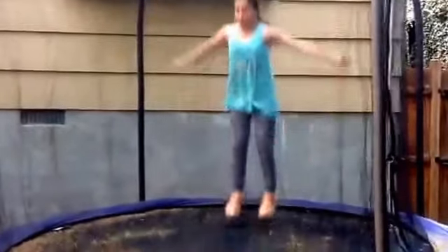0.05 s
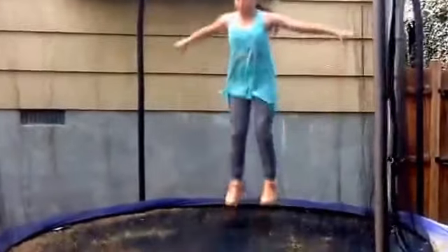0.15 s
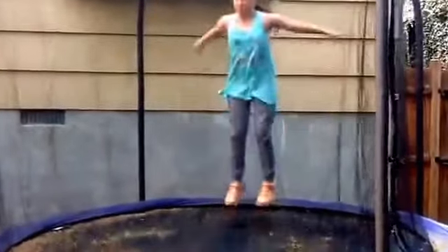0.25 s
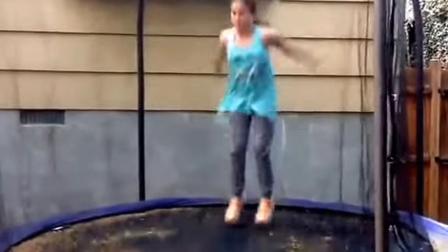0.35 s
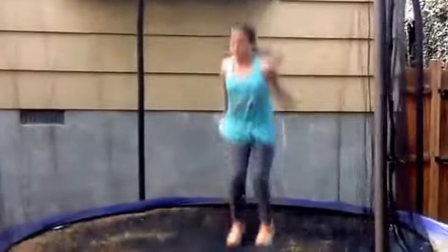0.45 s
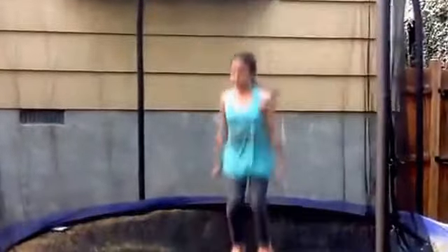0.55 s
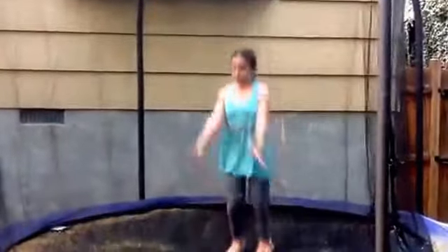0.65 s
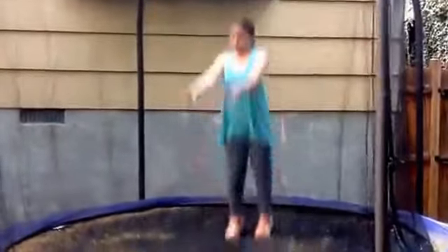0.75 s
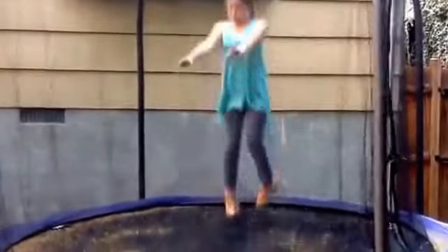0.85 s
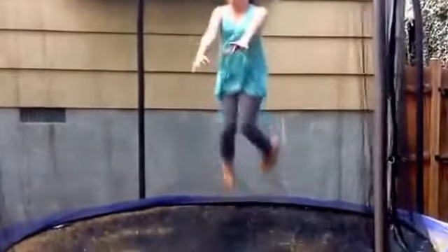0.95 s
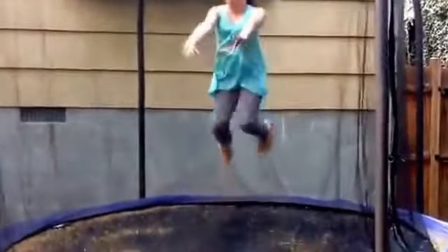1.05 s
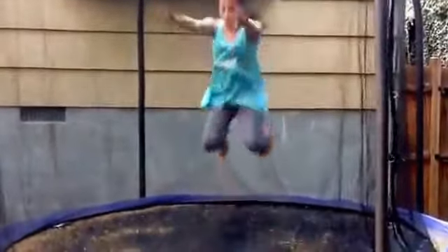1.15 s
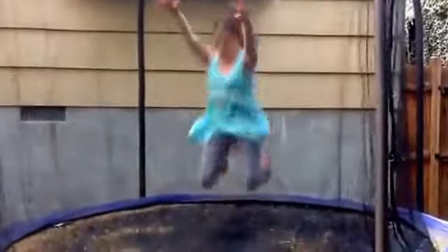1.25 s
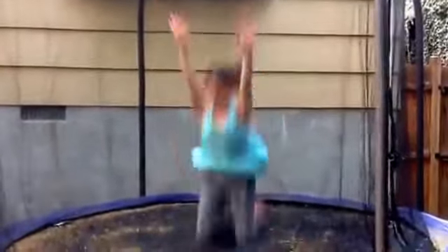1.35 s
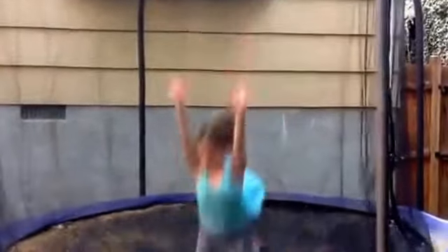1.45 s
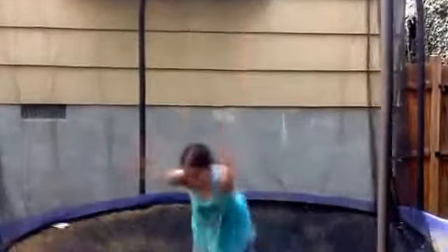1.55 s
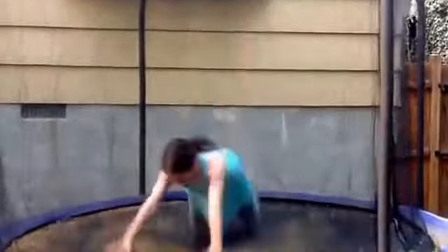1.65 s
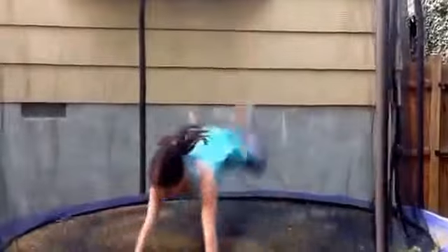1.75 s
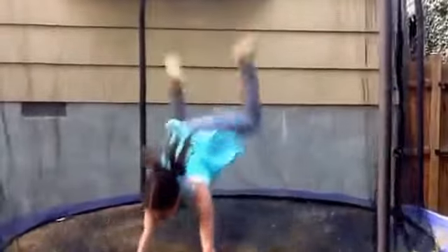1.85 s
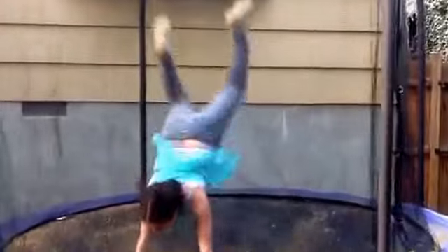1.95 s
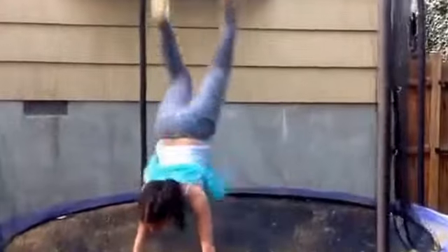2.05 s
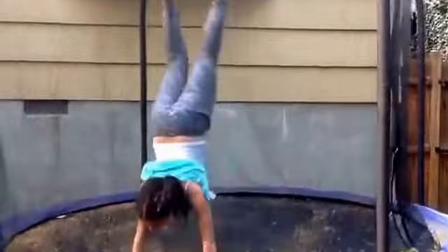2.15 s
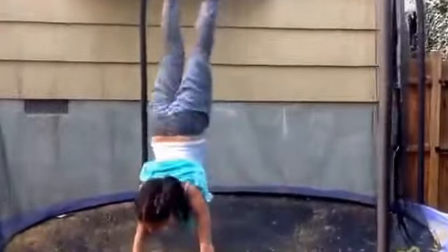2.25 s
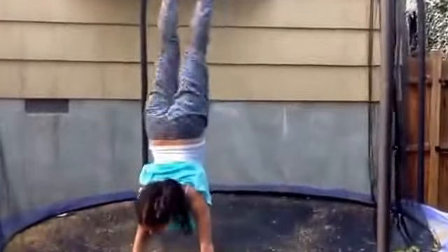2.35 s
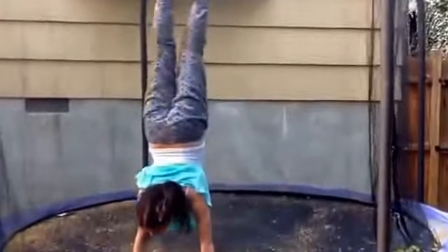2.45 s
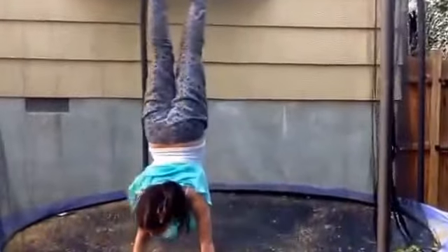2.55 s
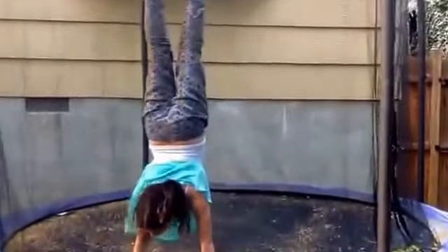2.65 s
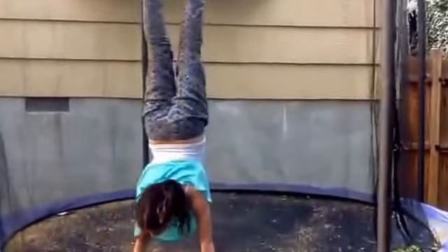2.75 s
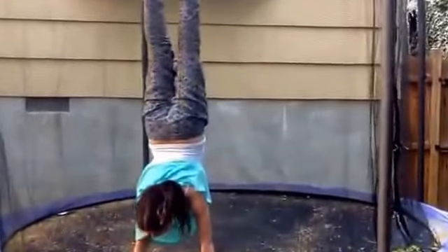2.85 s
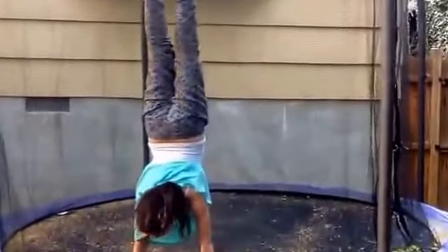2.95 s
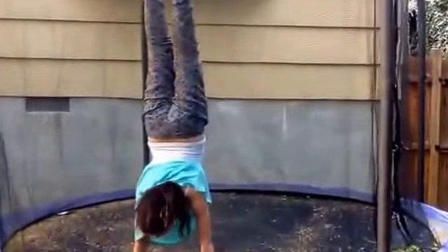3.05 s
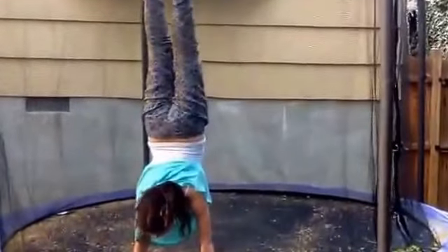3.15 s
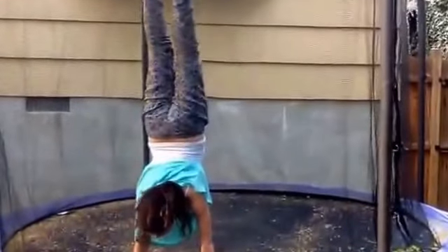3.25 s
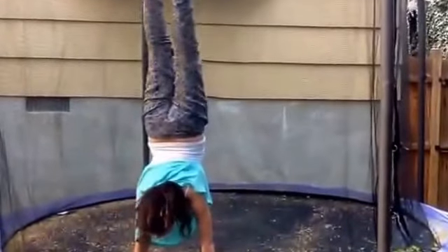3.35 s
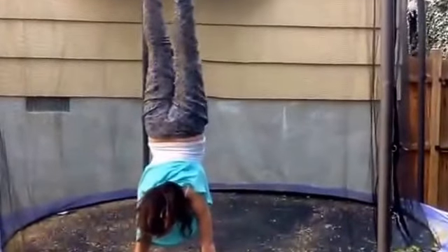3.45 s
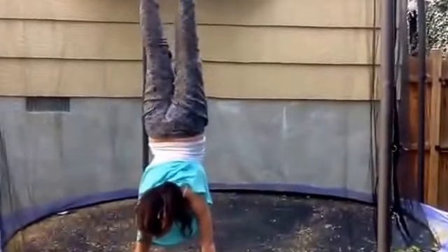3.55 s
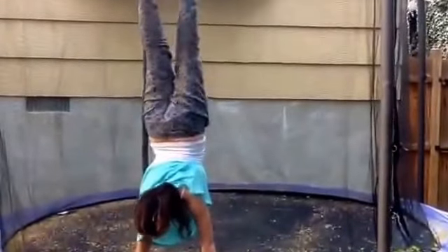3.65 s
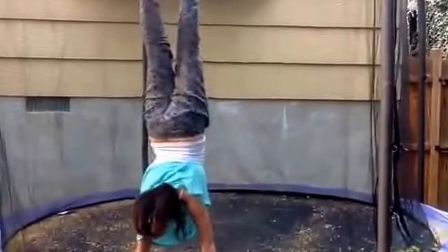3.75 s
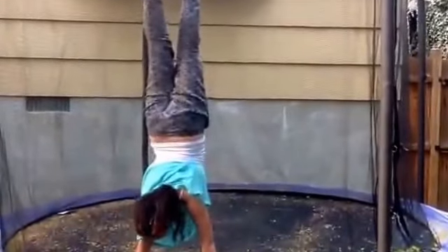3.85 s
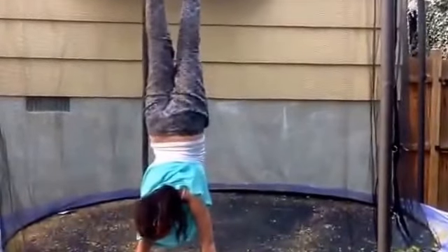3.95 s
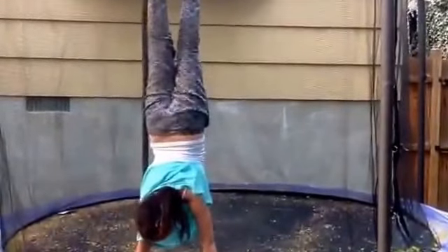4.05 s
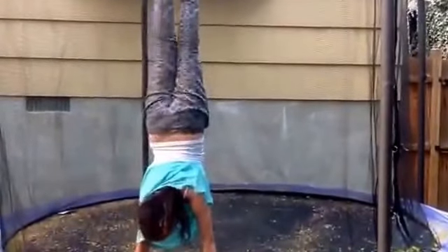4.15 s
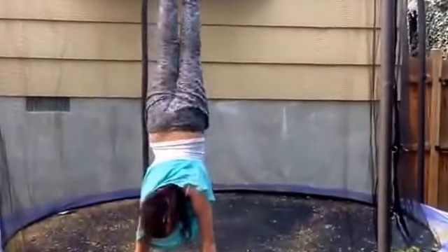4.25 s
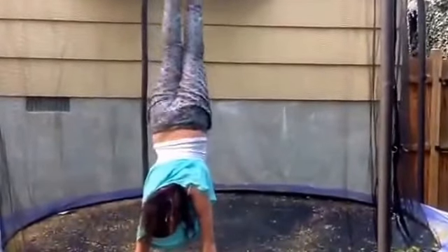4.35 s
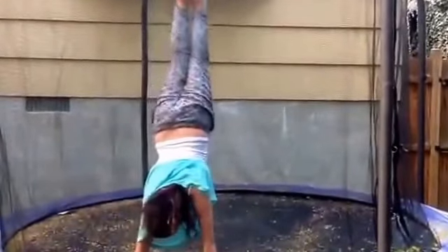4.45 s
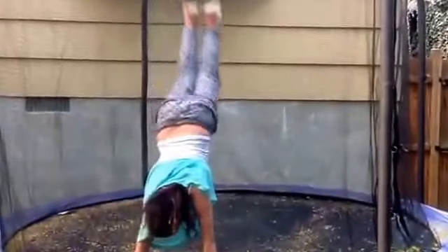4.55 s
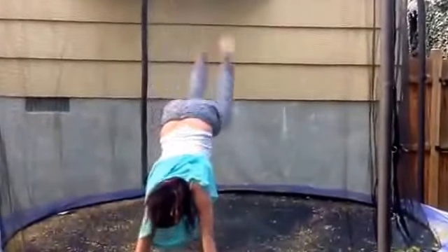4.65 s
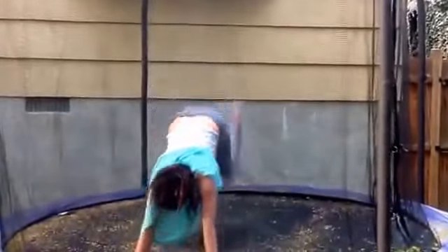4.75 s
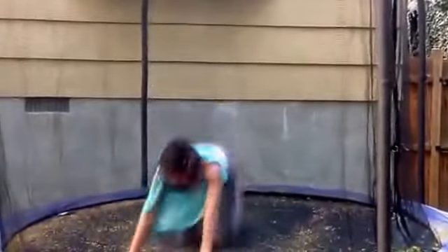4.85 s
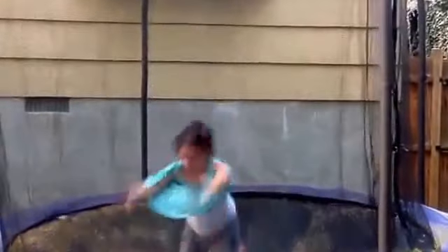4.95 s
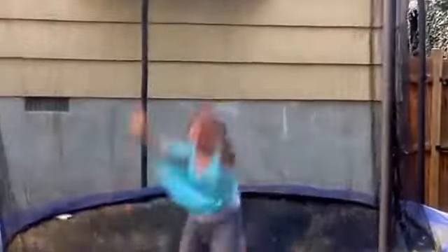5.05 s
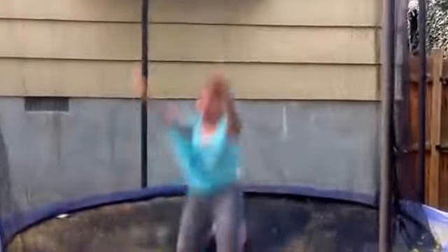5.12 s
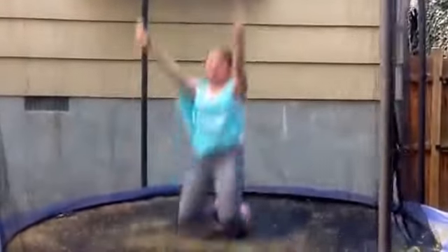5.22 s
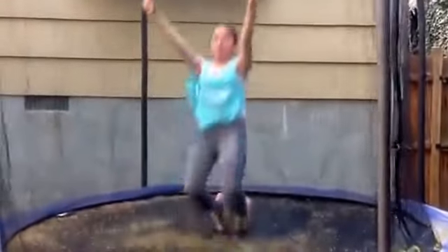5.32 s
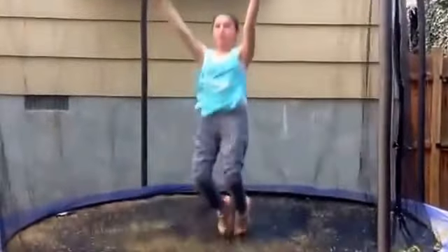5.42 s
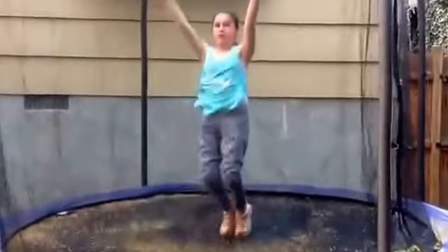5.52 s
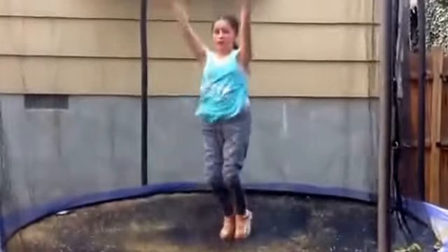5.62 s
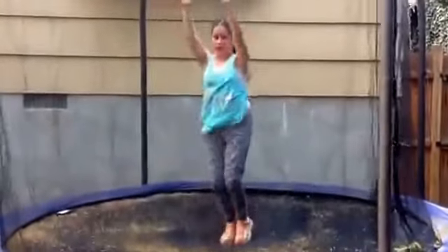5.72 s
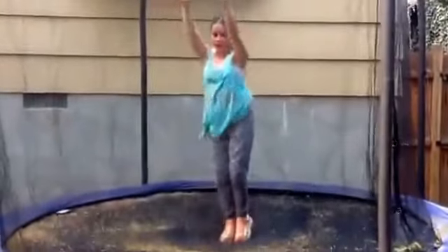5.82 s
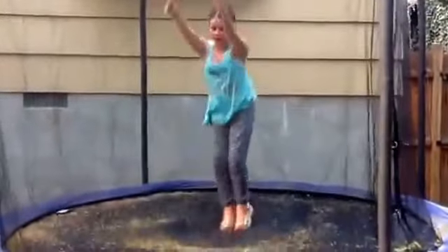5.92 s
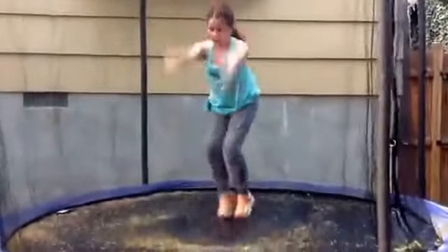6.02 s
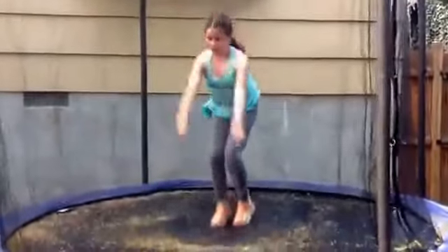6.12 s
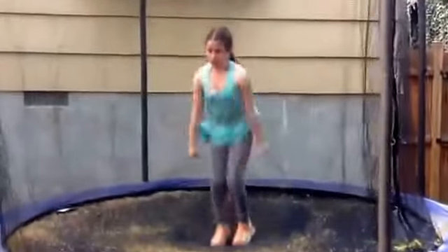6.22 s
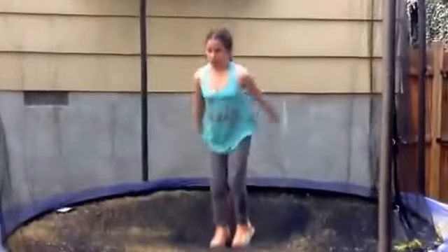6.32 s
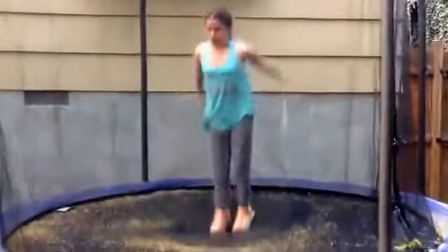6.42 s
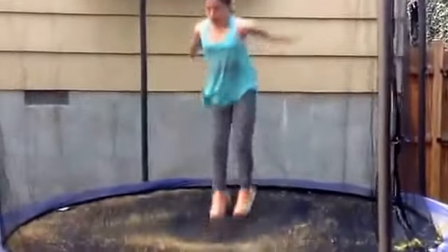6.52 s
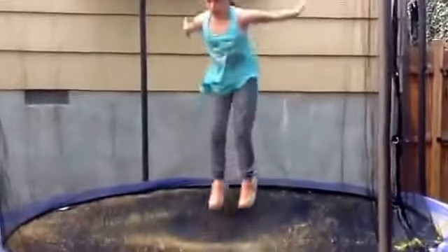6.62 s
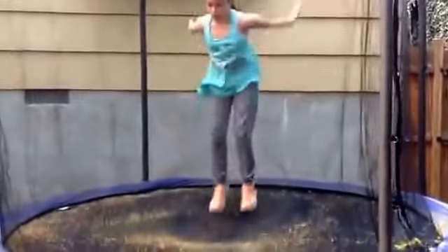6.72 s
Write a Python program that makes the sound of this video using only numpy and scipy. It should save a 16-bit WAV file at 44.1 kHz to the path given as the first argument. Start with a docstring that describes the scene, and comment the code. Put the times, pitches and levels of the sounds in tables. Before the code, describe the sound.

Uneven trampoline bounces, a sharp ringing clack of the frame, a lull, then more landings over faint chirps and distant traffic.

```python
"""Bouncing on a backyard trampoline

Feet slap the woven mat, which thuds, swishes as it stretches and makes the springs squeak.
Two heavy landings frame a quiet handstand; the first comes with a hard, ringing clack of the frame.
Small birds call over the rumble of a far town, and the house wall and fence send back an echo."""
import sys
import numpy as np
from scipy import signal
from scipy.fft import rfft, irfft, next_fast_len
from scipy.io import wavfile
from scipy.ndimage import map_coordinates

SR = 44100
rng = np.random.default_rng(int(sys.argv[2]) if len(sys.argv) > 2 else 0)


def store_pcm(level_fs):
    """Save levels as 16-bit WAV."""
    pcm = np.round(np.clip(level_fs, -1, 1) * 32767).astype(np.int16)
    wavfile.write(sys.argv[1], SR, np.atleast_2d(pcm).T)


N = 298998

# Skin hits the mat. Each row: start in seconds, level in dB, fizz in dB above that level,
# fade time in seconds. A fade time is how long a sound takes to drop by 60 dB.
SKIN_SLAPS = [(0.0806, -50, -4.5, 0.033), (0.3763, -51.5, -8, .05), (0.525, -31, -6.5, 0.016),
              (0.617, -28, -12, 0.083), (0.8867, -52.5, -1, 0.036), (1.4235, -45, -3, 0.039),
              (1.8087, -36.5, -13.5, 0.107), (2.93, -53.5, 1.5, 0.031), (4.6892, -38.5, -20, 0.16),
              (4.9255, -49, 3, 0.047), (5.0, -34, -3.5, 0.049), (5.645, -41.5, -7, .09),
              (6.0157, -31.5, -21.5, 0.098), (6.0582, -40, -24, 0.066), (6.466, -40.5, -20, .13),
              (6.7228, -44.5, -16.5, 0.177)]
# Weight lands on the mat. Each row: start in seconds, level in dB, pitch in Hz, fade time in seconds.
MAT_THUDS = [(1.413, -37.5, 251.3, 0.076), (1.427, -31, 248, 0.03), (1.488, -39, 290, 0.059),
             (1.514, -31.5, 251, 0.08), (1.779, -49.5, 317, 0.14), (4.9223, -25, 233.4, 0.022),
             (5.024, -35, 257, 0.063)]
# Clothed legs hit the mat. Each row: loudest moment in seconds, level in dB,
# boom in dB above that level, rise time in seconds, fade time in seconds.
LEG_SMACKS = [(0.615, -53, -2, .03, 0.21), (1.518, -34, -3, 0.0146, 0.063),
              (5.026, -32.5, -1.5, 0.0045, 0.071)]
# The tone of the cloth, and of the mat booming under it. Each row: frequency in Hz, strength in dB.
CLOTH_TONE = [(200, -22.5), (410, -2), (620, -12), (800, -6), (1000, 0.5), (1550, 1.5), (2100, -11),
              (4000, -16.5), (9000, -23), (15000, -17)]
BOOM_TONE = [(40, -47), (130, -16), (250, -1), (420, 1.5), (700, -21), (1500, -13)]
# Hard knocks in the frame. Each row: start in seconds, level in dB, strongest frequency in Hz.
FRAME_KNOCKS = [(1.482, -27, 3680), (1.494, -16.5, 7500), (1.809, -42, 3700), (2.157, -56.5, 2390),
                (2.827, -52.5, 2750), (4.832, -41, 2520)]
# The notes the frame rings at. Each row: pitch in Hz, strength in dB, fade time in seconds.
FRAME_NOTES = [(1330, -16, .12), (1513, -1.5, 0.27), (2336, 1.5, 0.17), (3180, 2, 0.105),
               (3560, 1.5, 0.075), (4174, -2, 0.12), (4844, -1, 0.045), (6920, -2, 0.0496),
               (7330, -2.5, 0.12), (7600, -13, .055), (7850, -2, 0.092), (8156, 0.5, 0.089),
               (8800, -16.5, .04), (11000, -1, 0.088)]
# Weight stretches the mat. Each row: start in seconds, level in dB, time held in seconds.
MAT_PRESSES = [(0.434, -59, 0.122), (0.55, -54, 0.093), (1.42, -57.5, .08), (1.5, -42.5, 0.15),
               (1.925, -59, 0.045), (2.3, -60, 0.032), (2.852, -65, 0.0225), (4.913, -53, 0.095),
               (4.993, -42, 0.12), (5.659, -60.5, 0.19), (6.003, -60, 0.169), (6.277, -59.5, 0.12)]
# The mat springs back or sways. Each row: loudest moment in seconds, level in dB.
MAT_SWAYS = [(0.0, -60.5), (0.75, -57.5), (1.85, -59), (1.99, -56), (4.46, -69.5), (4.82, -65), (5.45, -63),
             (5.58, -64.5), (5.98, -66), (6.33, -57), (6.44, -59.5)]
# The tone of the rubbing weave. Each row: frequency in Hz, strength in dB.
WEAVE_TONE = [(240, -36.5), (400, -1.5), (558, -7), (964, -2), (1290, -7), (1740, -2.5), (2120, -4.5),
              (5110, -8), (8060, -6.5), (12300, -7), (15000, -10.5)]
# A lightly loaded weave sounds thinner. Each row: frequency in Hz, change in dB.
LIGHT_LOAD_CHANGE = [(1000, -1), (3000, 3), (7000, 1), (12000, 1.5), (15000, -1)]
# Spring hooks slip. Each row: start in seconds, length in seconds, pitch in Hz, level in dB, strongest
# frequency in Hz, drop in dB per octave away from it, unsteadiness as a share of the pitch.
HOOK_SLIPS = [(1.852, 0.0288, 1100, -52, 1000, 11, 0.045), (1.927, 0.0255, 1133, -47, 1780, 14, .07),
              (1.971, .025, 1150, -55.5, 1900, 11, .07), (2.264, 0.0196, 1010, -57.5, 2000, 4.5, 0.1),
              (2.3215, 0.032, 980, -51.5, 1030, 4.5, 0.013), (2.715, 0.061, 499.3, -57, 1090, 17, .03),
              (4.439, 0.091, 1139, -62, 1410, 11, 0.0445), (5.237, 0.04, 1290, -48.5, 1910, 16.5, 0.043),
              (5.314, 0.035, 1400, -52, 1500, 11, 0.2)]
# Harsh bird calls. Each row: start in seconds, level before mixing in dB.
BIRD_RASPS = [(0.268, -64.5), (1.19, -67), (2.497, -63.5), (3.31, -63), (4.367, -63.5), (5.33, -65),
              (6.556, -64.5)]
# Sliding bird whistles. Each row: start in seconds, final pitch in Hz, level before mixing in dB.
BIRD_SLIDES = [(0.44, 2280, -60), (0.86, 2780, -66.5), (0.895, 2280, -62.5), (2.2, 3142, -71.5),
               (2.35, 2704, -66.5), (2.74, 2057, -67), (2.86, 2610, -71.5), (3.285, 2842, -68.5),
               (3.385, 2010, -67.5), (4.41, 2294, -67), (4.565, 2258, -61), (5.88, 2815, -65.5),
               (6.04, 1994, -69), (6.5, 2093, -65.5)]
# Short bird pips. Each row: start in seconds, level before mixing in dB.
BIRD_PIPS = [(0.189, -65), (1.005, -61.5), (2.943, -69.5), (4.309, -65.5)]
# Thin, high pings. Each row: start in seconds, pitch in Hz, level before mixing in dB.
HIGH_PINGS = [(0.13, 8520, -62), (0.932, 8430, -52), (0.94, 11170, -59), (2.85, 10800, -67),
              (6.575, 11300, -63)]
# How the far traffic rises and falls. Each row: time in seconds, level of its quieter moments in dB.
TRAFFIC_LEVELS = [(0.0, -58), (0.49, -57.5), (3.42, -58), (3.7, -58), (5.17, -56.5), (5.44, -58.5),
                  (6.78, -59)]
# The tone of the traffic, and of the hiss in the air. Each row: frequency in Hz, strength in dB.
TRAFFIC_TONE = [(15, -76), (25, -55), (37, -37), (75, -19), (103, -11.5), (178, -1), (266, -8), (303, -7.5),
                (564, -14), (978, -15), (1310, -21), (1520, -26), (1730, -31), (2000, -32), (2600, -71),
                (4400, -120)]
HISS_TONE = [(500, -74), (1400, -4), (2100, -5), (2900, -6.5), (3700, -10), (7500, -12), (15000, -12.5)]
# The echo of the trampoline, and of the far birds. Each row: frequency in Hz, fade time in seconds.
NEAR_ECHO = [(200, 0.16), (1200, 0.352), (2600, 0.388), (5000, 0.6), (15000, 0.21)]
FAR_ECHO = [(200, 0.31), (1900, 0.55), (2700, 0.827), (5000, 0.44), (15000, 0.37)]


def skin_slaps():
    """Skin meets the tight weave: a snap, then a short spray of middle, high and very high noise."""
    out, t = np.zeros(N), clock(0.29)
    for start, db, fizz_db, fade_s in SKIN_SLAPS:
        body = noise([(300, -36.5), (1200, -8.5), (3000, -3), (5000, -11), (8000, -25.5)], len(t))
        sheen = noise([(3500, -11.5), (6500, -3.5), (9000, -3.5), (12000, -14.5)], len(t))
        fizz = noise([(6000, -43), (10000, 1.5), (15000, 0.5)], len(t))
        spray = gain(-15) * body + gain(-12.5) * sheen + gain(fizz_db) * fizz
        shape = 0.802 * fade(t, fade_s) + 0.434 * fade(t, 0.01)
        add(out, start + 0.001, gain(db) * shape * spray)
    return out


def mat_thuds():
    """The mat pushes the air for a few swings that quickly die away."""
    out, t = np.zeros(N), clock(0.68)
    for start, db, hz, fade_s in MAT_THUDS:
        low_noise = noise([(50, -7.5), (200, 5.5), (450, -8), (1200, -38)], len(t))
        push = np.sin(2 * np.pi * hz * t) + 0.5 * low_noise
        add(out, start, gain(db) * push * fade(t, fade_s) * rise(t, 0.002))
    # Air slips round the open mat, so the deepest bass cancels.
    return signal.sosfilt(signal.butter(2, 130, "highpass", fs=SR, output="sos"), out)


def leg_smacks():
    """Cloth and legs flatten on the mat: the smack grows, peaks and dies, and the mat booms under it."""
    out, t = np.zeros(N), clock(0.25)
    lead_s = 0.06
    for peak, db, boom_db, rise_s, fade_s in LEG_SMACKS:
        shape = np.exp(np.minimum(t - lead_s, 0) / rise_s) * fade(np.maximum(t - lead_s, 0), fade_s)
        smack = noise(CLOTH_TONE, len(t)) + gain(boom_db) * noise(BOOM_TONE, len(t))
        add(out, peak - lead_s, gain(db) * shape * smack)
    return out


def frame_clacks():
    """A hard knock cracks and briefly rings the frame; harder knocks reach higher notes."""
    out, t = np.zeros(N), clock(0.16)
    pitches, note_db, fade_s = np.transpose(FRAME_NOTES)[:, :, None]
    attack = rise(t, 0.00015)
    burst = attack * fade(t, 0.007)
    for start, db, bright_hz in FRAME_KNOCKS:
        octaves_away = np.abs(np.log2(pitches / bright_hz))
        strengths = gain(note_db + rng.normal(0, 1, pitches.shape) - 8.26 * octaves_away)
        phases = [2 * np.pi * (hz * t + rng.random()) + 0.85 * wobble(369.7, len(t)) for hz in pitches]
        ring = np.sum(strengths * np.sin(phases) * fade(t, fade_s), axis=0) / np.linalg.norm(strengths)
        crack = noise([(bright_hz / 8, -22), (bright_hz / 2, -6), (bright_hz * 0.7, -6), (bright_hz, 0),
                       (bright_hz * 1.454, -7), (bright_hz * 2, -17), (bright_hz * 4, -28)], len(t))
        snap = crack * burst * np.linalg.norm(burst) / np.linalg.norm(crack * burst)
        tail = attack * (0.47 * ring + 0.1 * crack * fade(t, 0.16))
        add(out, start, gain(db) * (1.2 * snap + tail))
    return out


def mat_swish():
    """The weave and its safety net rub as they stretch under the weight and as they sway back."""
    thin_tone = [(hz, db + look_up(LIGHT_LOAD_CHANGE, hz)) for hz, db in WEAVE_TONE]
    return rubbing(press_level(), WEAVE_TONE) + rubbing(sway_level(), thin_tone)


def press_level():
    """How loud the presses are: each starts at once, sags while the weight sinks, then lets go."""
    power, t = np.zeros(N), clock(0.7)
    sag_db_per_s, release_db_per_s = 26, 70
    for start, db, hold_s in MAT_PRESSES:
        loss_db = sag_db_per_s * t + release_db_per_s * np.maximum(t - hold_s, 0)
        add(power, start, (gain(db - loss_db) * rise(t, 0.0093)) ** 2)
    return np.sqrt(power)


def sway_level():
    """How loud the sways are: each swells, then dies away more slowly."""
    t = np.arange(0, N / SR, 0.005)
    power = np.zeros(len(t))
    rise_db_per_s, fall_db_per_s = 85, 53
    for peak, db in MAT_SWAYS:
        loss_db = np.maximum(rise_db_per_s * (peak - t), fall_db_per_s * (t - peak))
        power += gain(db - loss_db) ** 2
    return curve(np.column_stack([t, np.sqrt(power)]))


def rubbing(level, tone):
    """Fibres rub with a grainy hiss, and single ones tick free."""
    grain = unit(gain(1.23 * wobble(900, N) + 0.23 * wobble(60, N)))
    slips = (rng.random(N) < 45 / SR) * rng.uniform(0.3, 1, N)  # about 45 a second
    ticks = signal.fftconvolve(slips, fade(clock(0.02), 0.023))[:N]
    tick_level = np.minimum(level, gain(-60))  # under a heavy load the ticks merge into the rush
    return (level * grain + 1.98 * tick_level * ticks) * noise(tone, N)


def spring_squeaks():
    """Steel hooks stick and slip on the frame: single squeaks that sink a little, and one quick run."""
    out = np.zeros(N)
    for start, length_s, hz, db, bright_hz, drop_db, unsteadiness in HOOK_SLIPS:
        sinking_hz = hz * (1 + 0.029 * (0.5 - progress(length_s)))
        add(out, start, gain(db) * squeak(sinking_hz, bright_hz, drop_db, unsteadiness))
    # As the handstand tips over, one hook gives five even squeaks that each rise and fall.
    run_start, gap_s = 4.525, 0.031
    arched_hz = 1468 * (1 - 0.17 * (2 * progress(0.0267) - 1) ** 2)
    for k in range(5):
        note = squeak(arched_hz, bright_hz=1200, drop_db=13, unsteadiness=0.03)
        add(out, run_start + k * gap_s, gain(-57.5) * note)
    return out


def squeak(hz, bright_hz, drop_db, unsteadiness):
    """One hook slips at an unsteady rate, which gives a rough note with overtones."""
    size = len(hz)
    phase = phase_of(hz * (1 + unsteadiness * wobble(785, size)))
    multiples = np.arange(1, 9)[:, None]
    strengths = gain(-drop_db * np.abs(np.log2(multiples * hz / bright_hz)))
    note = np.sum(strengths * np.sin(multiples * phase), axis=0)
    swell = arch((np.arange(size) / size) ** 0.72, edge=0.77)  # loudest early
    return unit(note * gain(2.2 * wobble(600, size))) * swell


def birds():
    """Small birds give harsh calls with a whistled ending, lone slides, pips and one long whistle."""
    out = np.zeros(N)
    for start, db in BIRD_RASPS:
        add(out, start, gain(db) * rasp())
        add(out, start + 0.05, gain(db - 3) * slide(final_hz=2657, waver_hz=91))
    for start, final_hz, db in BIRD_SLIDES:
        add(out, start, gain(db) * slide(final_hz, waver_hz=52.6))
    pip_hz = 2015 * (1 - 0.1 * (1.42 * progress(0.054) - 0.5) ** 2)
    for start, db in BIRD_PIPS:
        add(out, start, gain(db) * whistle(pip_hz, waver_hz=15.3))
    # The long whistle scoops up, then sags and fades.
    t = clock(0.22)
    long_hz = 2880 - 799 * np.exp(-t / 0.00705) - 450 * t
    add(out, 3.852, gain(-60.5 - 26 * t) * whistle(long_hz, waver_hz=50.3))
    return out


def rasp():
    """A call that rises and falls, made harsh by a fast, wide warble."""
    t = clock(0.135)
    size, share = len(t), t / t[-1]
    centre_hz = np.interp(share, [0, 0.28, 1], [3850, 4200, 2750])
    warble = np.sin(phase_of(130 * (1 + 0.2572 * wobble(89.4, size))))
    hz = centre_hz * (1 + 0.1703 * warble + 0.0375 * wobble(903, size))
    swell = arch(share ** 0.65, edge=0.9)
    return unit(np.sin(phase_of(hz)) * swell * gain(3.6 * wobble(59, size)))


def slide(final_hz, waver_hz):
    """A whistle that glides down and levels off."""
    return whistle(final_hz * (1 + 0.16 * (1 - progress(0.105)) ** 3.21), waver_hz)


def whistle(hz, waver_hz):
    """A pure note that wavers in pitch and loudness."""
    size = len(hz)
    note = np.sin(phase_of(hz + waver_hz * wobble(241.6, size)))
    swell = arch(np.arange(size) / size, edge=0.3)
    return unit(note * swell * gain(2.4 * wobble(85, size)))


def high_pings():
    """Faint, very high notes that start softly and ring away."""
    out, t = np.zeros(N), clock(0.2)
    for start, hz, db in HIGH_PINGS:
        note = np.sin(phase_of(hz + 28 * wobble(240, len(t))))
        add(out, start, gain(db) * note * fade(t, 0.16) * rise(t, 0.0088))
    return out


def yard_echo(sound, fade_times):
    """Wall and fence scatter the sound back; each frequency dies at its own speed."""
    hz, t, bands = signal.stft(rng.standard_normal(SR), SR, nperseg=256)
    tail = signal.istft(bands * fade(t, look_up(fade_times, hz)[:, None]), SR, nperseg=256)[1]
    delayed = np.pad(sound, (int(0.008 * SR), 0))
    return signal.fftconvolve(delayed, tail / np.linalg.norm(tail))[:N]


def far_town():
    """Far traffic rumbles under a thin, even hiss."""
    average_db = curve(TRAFFIC_LEVELS) + 1
    rumble = gain(average_db + 0.63 * wobble(6, N)) * noise(TRAFFIC_TONE, N)
    return rumble + gain(-68) * noise(HISS_TONE, N)


def gain(db):
    """Turn decibels into a number to multiply by."""
    return 10 ** (np.asarray(db) / 20)


def unit(sound):
    """Scale a sound to an average power of 1."""
    return sound / np.sqrt(np.mean(sound ** 2) + 1e-20)


def look_up(rows, hz):
    """Read between rows of frequency and value, with octaves evenly spaced."""
    frequencies, values = np.transpose(rows)
    return np.interp(np.log(hz + 1), np.log(frequencies + 1), values)


def curve(rows):
    """Join rows of time and value into one value per sample."""
    return np.interp(np.arange(N) / SR, *np.transpose(rows))


def clock(length_s):
    """The time of each sample in seconds."""
    return np.arange(int(length_s * SR)) / SR


def progress(length_s):
    """A steady climb from 0 to 1."""
    return clock(length_s) / length_s


def wobble(rate, size):
    """A smooth curve through `rate` random points a second."""
    points = rng.standard_normal(int(size * rate / SR) + 4)
    return map_coordinates(points, [np.arange(size) * rate / SR])


def noise(tone, size):
    """Noise of power 1, shaped by rows of frequency in Hz and strength in dB."""
    padded = next_fast_len(size)
    strengths = gain(look_up(tone, np.fft.rfftfreq(padded, 1 / SR)))
    return unit(irfft(rfft(rng.standard_normal(padded)) * strengths, padded)[:size])


def rise(t, rise_s):
    """Climb towards 1, about two thirds of the way by rise_s."""
    return 1 - np.exp(-t / rise_s)


def fade(t, fade_s):
    """Die away, 60 dB down by fade_s."""
    return gain(-60 * t / fade_s)


def arch(share, edge):
    """A rounded swell as share goes from 0 to 1; a small edge makes it squarer."""
    return np.abs(np.sin(np.pi * share)) ** edge


def phase_of(hz):
    """The angle a wave has turned through as its pitch moves."""
    return 2 * np.pi * np.cumsum(hz) / SR


def add(track, start, sound):
    """Mix a sound in at a start time in seconds."""
    part = track[max(round(start * SR), 0):][:len(sound)]
    part += sound[:len(part)]


def scene():
    """Mix it all: the near trampoline has little echo, the far birds have a lot."""
    blows = skin_slaps() + mat_thuds() + leg_smacks() + frame_clacks()
    springs = spring_squeaks()
    calls = birds() + high_pings()
    echo = yard_echo(gain(-12) * blows + gain(-6.5) * springs, NEAR_ECHO)
    echo += yard_echo(gain(-3) * calls, FAR_ECHO)
    return (blows + mat_swish() + springs + gain(-2) * calls + echo + far_town())[None]


def record(dry):
    """Cut away the very highest treble."""
    top_hz = 15100
    padded = next_fast_len(N + SR // 2)
    kept = np.fft.rfftfreq(padded, 1 / SR) < top_hz
    return irfft(rfft(dry, padded) * kept, padded)[..., :N]


dry = scene()
out = record(dry)
store_pcm(out)
```